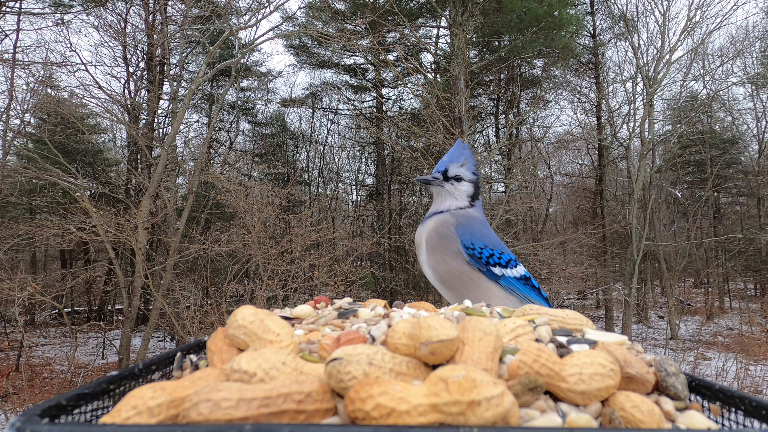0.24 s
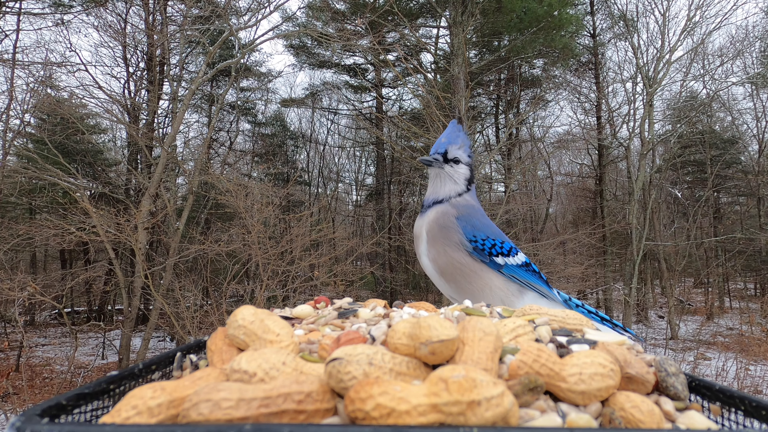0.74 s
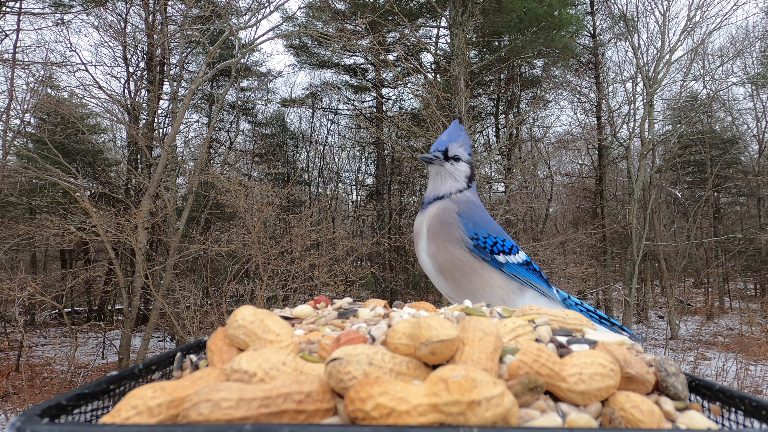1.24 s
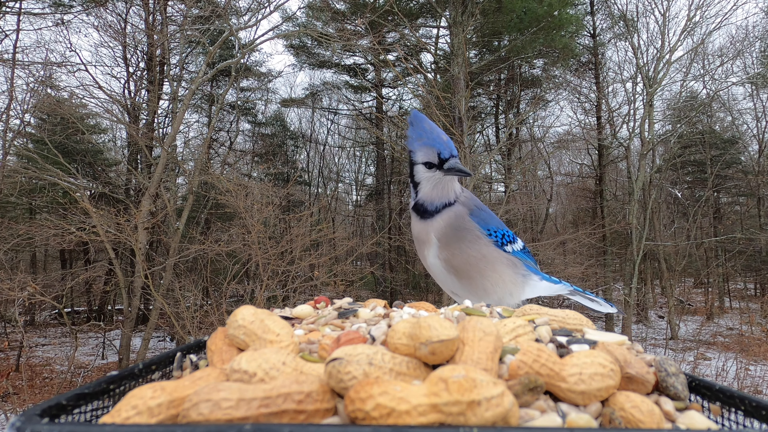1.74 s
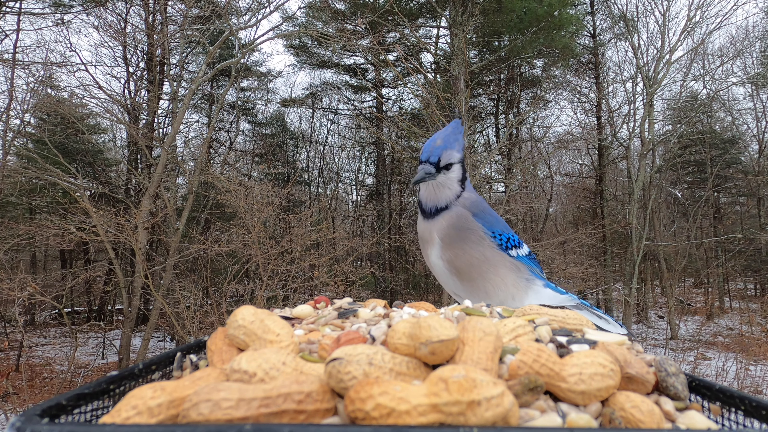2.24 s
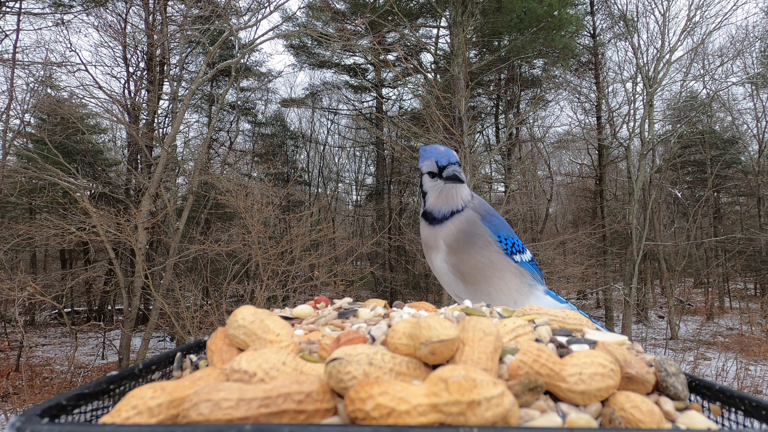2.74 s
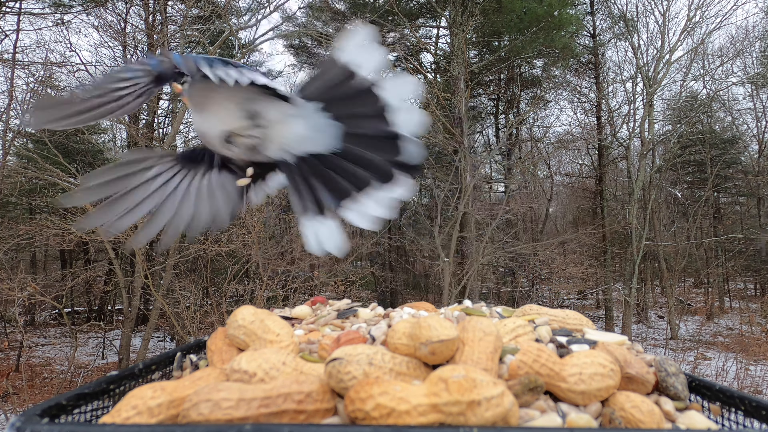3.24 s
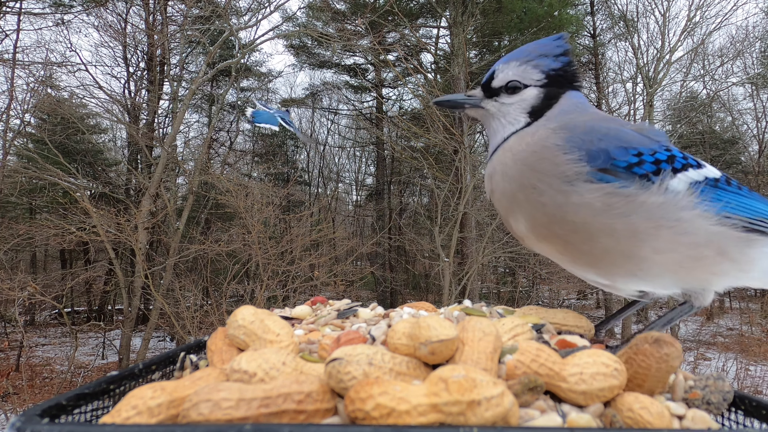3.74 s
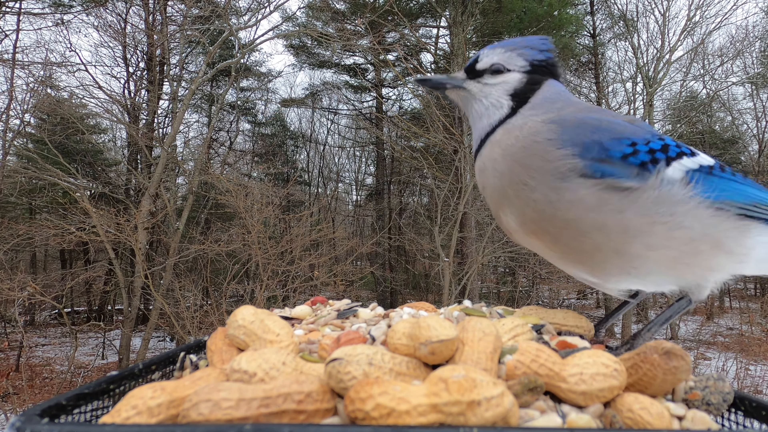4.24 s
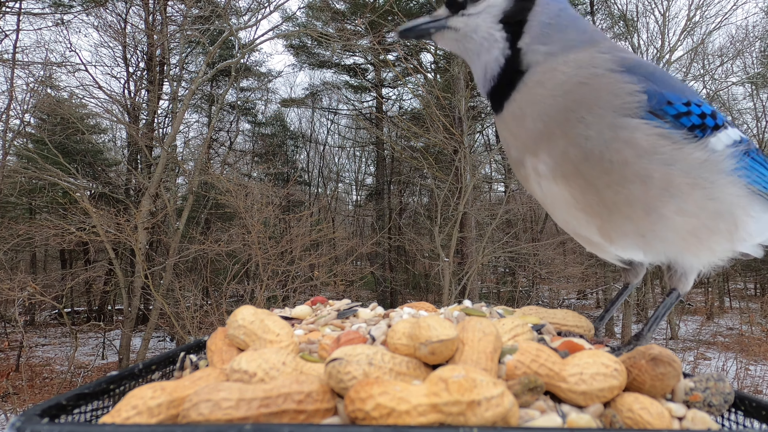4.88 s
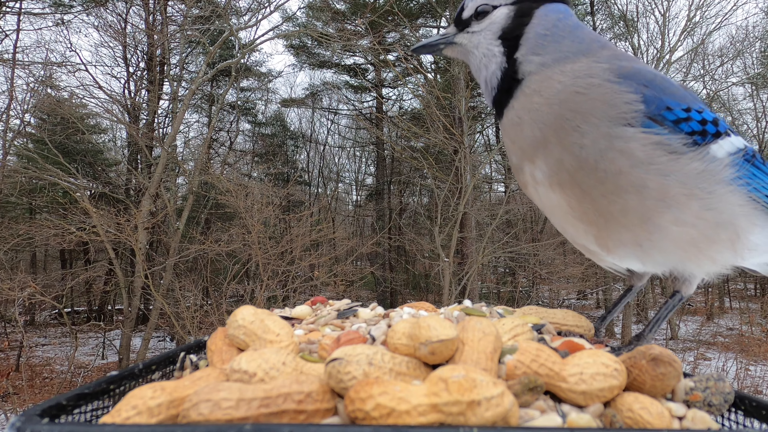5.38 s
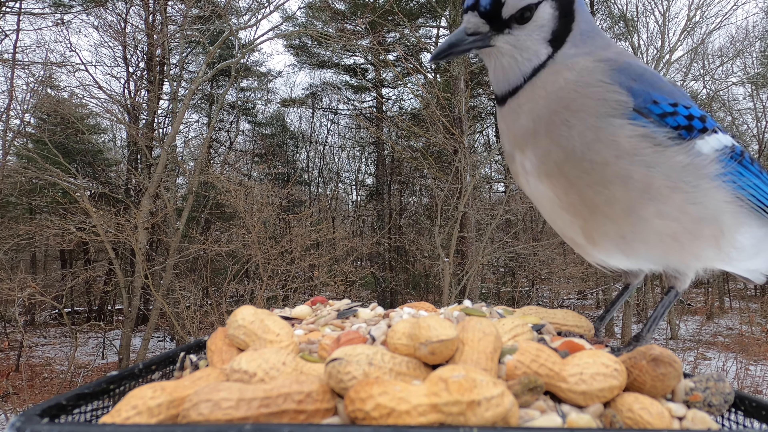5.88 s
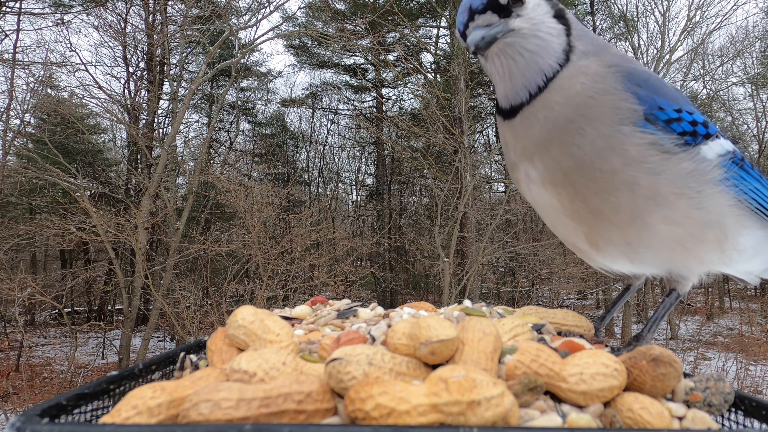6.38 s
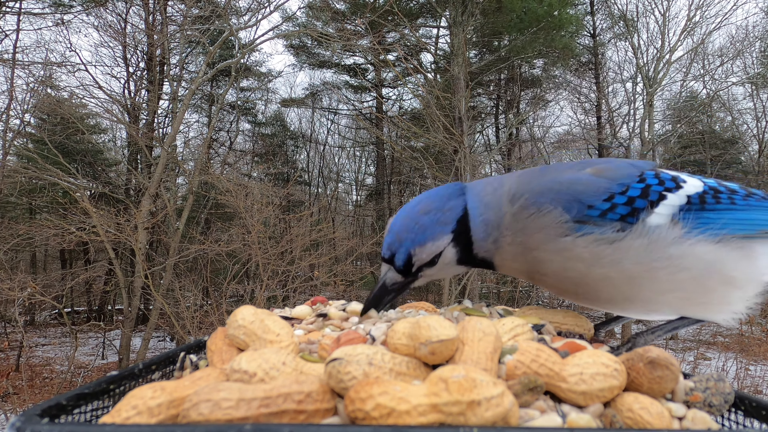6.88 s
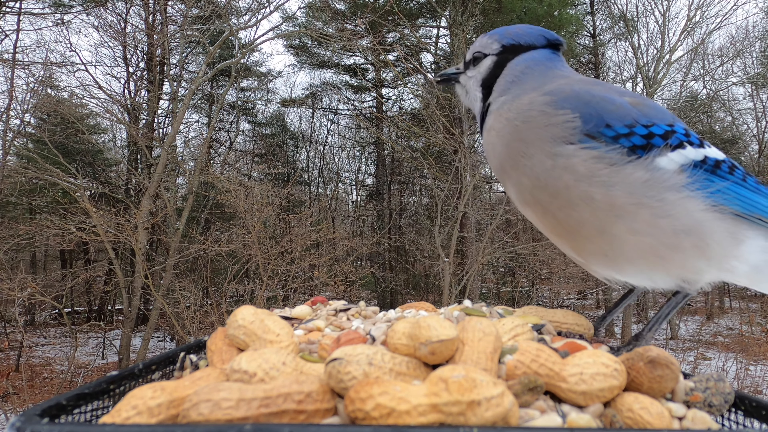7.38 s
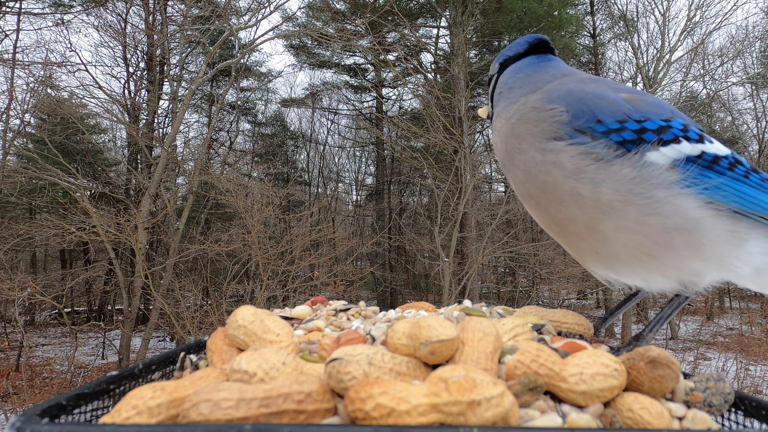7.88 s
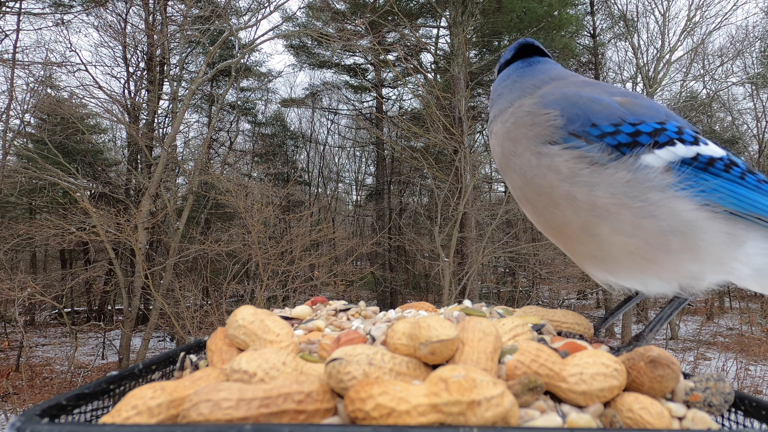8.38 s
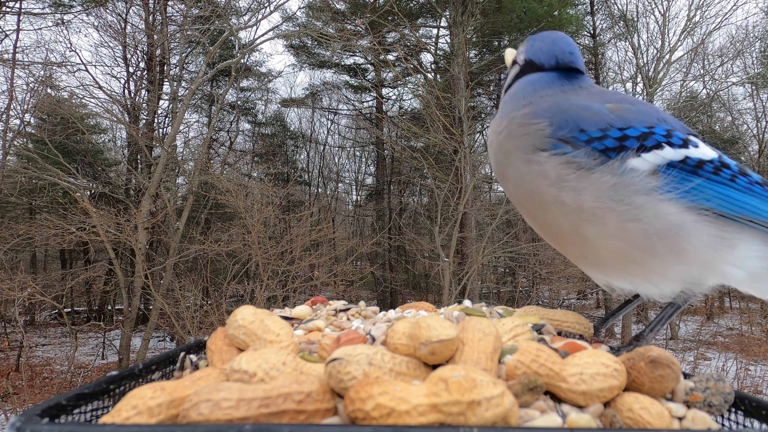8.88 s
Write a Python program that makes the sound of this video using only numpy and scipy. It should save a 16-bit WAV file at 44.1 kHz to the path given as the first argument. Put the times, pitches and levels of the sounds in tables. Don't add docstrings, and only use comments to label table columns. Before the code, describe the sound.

A small microphone sits right beside a nut-filled feeder tray in bare woods, over a faint low hum and light breeze. At 0 s a wing gust buffets it with slight claw scrapes, fading by 0.4 s. Thin high chips, faint trills and distant nasal crow caws follow. From 2.9 s feathers rustle and flap with claw scratches; around 3.4 s feet hit the tray with a sharp, short ringing knock, and a heavy low wing gust peaks near 3.6 s, dying by 4.2 s. From about 4.4 to 4.95 s the close jay calls loudly: gritty rasp, then two rounds of quick squeak and descending clear whistle, with a higher piping note, hoarse mutters and hard throat pops. Then quiet; crows caw and small birds chip, more strongly after 6.5 s. Dry bill ticks on nuts cluster at 6.8-7.3 s, with a few later, the last near 9 s.

```python
import sys
import numpy as np
from scipy import signal
from scipy.fft import rfft, irfft, next_fast_len
from scipy.io import wavfile
from scipy.ndimage import uniform_filter1d

SR = 44100
rng = np.random.default_rng(int(sys.argv[2]) if len(sys.argv) > 2 else 0)


def makeup_ratio(level_db):
    decades = np.asarray(level_db, float) / 20
    return 10 ** decades


def log_audio(samples):
    frames = np.atleast_2d(samples).T
    limited = np.clip(frames, -1, 1)
    pcm = np.round(limited * 32767).astype(np.int16)
    wavfile.write(sys.argv[1], SR, pcm)


N = 402191
T = np.arange(N) / SR


def unit(x):
    return x / np.sqrt(np.mean(x ** 2))


def colour(points):
    hz, db = np.transpose(points)
    log_hz = np.log(np.fft.rfftfreq(N, 1 / SR) + 1)
    gain = makeup_ratio(np.interp(log_hz, np.log(hz), db))
    return unit(irfft(rfft(rng.standard_normal(N)) * gain, N))


def band(x, lo_hz, hi_hz, order=2):
    return signal.sosfilt(signal.butter(order, [lo_hz, hi_hz], "bandpass", fs=SR, output="sos"), x)


def walk(rate_hz):
    k = int(SR / rate_hz)
    steps = np.repeat(rng.standard_normal(N // k + 1), k)
    return unit(uniform_filter1d(uniform_filter1d(steps, k), k)[:N])


def patchy(x, depth_db, rate_hz):
    edges_hz = np.geomspace(400, 16000, num=9)
    out = 0
    for k in range(8):
        out = out + (-1) ** k * band(x, edges_hz[k], edges_hz[k + 1]) * makeup_ratio(depth_db * walk(rate_hz))
    return unit(out)


def track(tables, fade_s=0.0014):
    rows = np.concatenate(tables)
    gate = 0
    for t in tables:
        inside_s = np.minimum(T - t[0][0] + fade_s, t[-1][0] + fade_s - T)
        gate = gate + np.clip(inside_s / fade_s, 0, 1)
    return np.interp(T, rows[:, 0], rows[:, 1]), np.minimum(gate, 1)


def bump(s, ms):
    return np.exp(-(1000 * (T - s) / ms) ** 2)


def pan(x, db):
    return x * makeup_ratio(np.array([db, -db]).reshape(2, -1) / 2)


def add(out, s, piece):
    i = max(int(s * SR), 0)
    n = min(piece.shape[-1], N - i)
    out[..., i:i + n] += piece[..., :n]


def stack(table, partials, waver, shake=1):
    s, hz = np.transpose(table)[:2]
    t = np.arange(s[0], s[-1], 1 / SR)
    i = (t * SR).astype(int)
    phase = 2 * np.pi * np.cumsum(np.interp(t, s, hz) * (1 + waver[i % N])) / SR
    edge = np.clip(np.minimum(t - s[0], s[-1] - t) / 0.0018, 0, 1)
    note = np.zeros(len(t))
    for k, db in partials:
        if k * hz.max() < .36 * SR:
            shimmer_db = (.4 + 1.1 * min(k - 1, 3)) * waver[(i + 9000 * k) % N] / waver.std()
            note += makeup_ratio(np.interp(t, s, db) + shake * shimmer_db) * np.sin(k * phase)
    return np.sqrt(2) * edge * note


def hum():
    # pitch_hz, level_db
    spectrum = [(60, -13), (110, -15), (160, -6), (315, -14), (450, -16.5), (600, -25), (1300, -26.5),
                (2000, -32.5), (3000, -41.5), (4000, -42.5), (6000, -44.5), (7500, -43), (8600, -54),
                (15500, -68)]
    # time_s, level_db
    loudness = [(0, -60.5), (.6, -63.5), (1.6, -64.5), (2.8, -64), (4.3, -61), (4.5, -64), (4.9, -66),
                (5.1, -65.5), (6.5, -62), (9.12, -62)]
    # time_s, level_db
    breezes = [
        [(0.5, -58), (0.83, -72), (2.9, -56)],
        [(4.45, -65), (4.75, -76), (5.3, -62.5), (9.12, -60.5)],
    ]
    level = makeup_ratio(np.interp(T, *np.transpose(loudness)) + 0.85 * walk(3.8))
    breeze_db, gate = track(breezes, 0.098)
    breeze = gate * makeup_ratio(breeze_db) * unit(band(rng.standard_normal(N), 6.9, 50))
    air = colour(spectrum)
    air = air + band(air, 2500, 16000, order=1) * (makeup_ratio(2.2 * walk(3.5)) - 1)
    return level * (air + 0.32 * colour(spectrum) * np.array([[1], [-1]])) + breeze


def eddies(lo_hz, hi_hz, smooth_s):
    x = band(rng.standard_normal((2, N)), lo_hz, hi_hz, order=3)
    return x / np.sqrt(uniform_filter1d(x ** 2, int(smooth_s * SR), axis=1) + 1e-12)


def gusts():
    # time_s, level_db
    flows = [
        [(0.0, -20.5), (0.05, -14.5), (0.1, -29.5), (0.308, -44), (0.5, -68)],
        [(2.9, -72), (3.2, -35.5), (3.33, -26.5), (3.41, -30.5), (3.45, -27), (3.53, -31), (3.579, -18),
         (3.72, -24), (4.25, -57.5)],
        [(4.27, -80), (4.354, -40), (4.45, -68)],
    ]
    # time_s, left_minus_right_db
    side = [(0, -29), (.2, -4.5), (3.5, 2.5), (3.57, -37), (3.62, 0), (3.75, -3), (4.2, 11.5)]
    # centre_s, level_db, length_ms, brightness_db
    slaps = [(.012, -15.5, 11.4, -7.5), (.044, -24.5, 6, 2), (.11, -35.5, 48, -43), (2.975, -53, 15, -9),
             (3.12, -55, 30, -12), (3.2, -42, 18, -6), (3.583, -20, 9, 0), (3.63, -28.5, 7.2, 0),
             (3.648, -25.5, 13, -18), (3.671, -29, 3.5, -1), (3.71, -40, 12, -28)]
    flow_db, gate = track(flows, 0.025)
    flow_db = uniform_filter1d(flow_db, size=300)
    push, flutter, buffet = makeup_ratio(flow_db), makeup_ratio(1.32 * flow_db - 9.5), makeup_ratio(1.29 * flow_db - 22.5)
    for s, db, ms, bright_db in slaps:
        slap = makeup_ratio(db) * bump(s, ms)
        flutter, buffet = flutter + slap, buffet + makeup_ratio(bright_db) * slap
    slow = eddies(10, 55, 0.029)
    spatter = makeup_ratio(-14.5 + 5.8 * walk(150)) * eddies(552, 1100, 0.0087)
    quick = flutter * eddies(70, 220, 0.031) + buffet * (eddies(240, 535, 0.016) + spatter)
    lean = pan(1, np.interp(T, *np.transpose(side)))
    air = push * (slow[0] + 0.4 * slow[1] * np.array([[1], [-1]]))
    air = air + 2 * quick * lean / np.sqrt(np.sum(lean ** 2, axis=0))
    return .6 * np.tanh(gate * air / .6)


def tray():
    # start_s, peak_db, brightness_db
    scrapes = [(0.0096, -35, 4.5), (0.03, -41, 4), (2.9298, -55, 8.5), (2.9624, -43, -4), (2.972, -44, -3),
               (3.022, -43, -3), (3.028, -46, 5), (3.085, -42, -6), (3.092, -35, 1), (3.1118, -25, 4),
               (3.117, -28, 4), (3.122, -31, 4), (3.127, -30, 1), (3.1407, -34, 1.5), (3.147, -35, 0),
               (3.1592, -34, 1), (3.1822, -41, 1), (3.2063, -42.5, -6), (3.245, -42, 3), (3.2523, -41, -1),
               (3.3229, -39, 2), (3.3518, -41, -2), (3.4032, -42, 0), (3.4165, -19, -1), (3.422, -22, 2),
               (3.431, -27, 2), (3.468, -43, 2), (3.5109, -40, 7), (3.558, -39, 6.5), (3.5878, -44, 5),
               (3.6322, -47, 3), (3.6855, -52, -5), (3.7115, -50, 0), (3.7589, -46, -1), (3.7768, -48, 4),
               (3.7948, -51, 4), (3.816, -46.5, 8), (3.8291, -44, -5), (3.906, -58, 2), (3.9659, -58, 2)]
    # start_s, peak_db
    ticks = [(4.052, -47.5), (4.289, -51.5), (6.771, -44), (6.777, -31.5), (6.809, -41.5), (6.906, -47),
             (6.913, -38.5), (6.926, -51), (7.082, -57.5), (7.123, -52), (7.136, -42.5), (7.152, -40),
             (7.252, -41), (7.341, -47.5), (7.905, -49.5), (7.923, -56), (8.549, -51.5), (8.979, -37),
             (8.984, -42.5)]
    # pitch_hz, level_db_per_hz
    grit = [(1290, -1), (2200, -4.5), (3000, 2), (4190, 3), (7620, -5), (8600, -14), (12000, -18),
            (16000, -27)]
    # time_s, level_db
    rustle = [(2.91, -84), (2.95, -69), (3.1, -66), (3.12, -55.5), (3.238, -55), (3.42, -53),
              (3.866, -69.5), (4.0, -78)]
    # centre_s, level_db, length_ms
    flaps = [(3.135, 2, 25), (3.215, 4, 18), (3.262, 6, 22), (3.31, 1.5, 14), (3.365, 3, 22),
             (3.445, 5, 20), (3.5, 3, 15), (3.6, 5, 30), (3.7, 4, 25), (3.8, 4, 35)]
    # pitch_hz, level_db, t60_s
    modes = [(385.3, -1.5, 0.08), (572, -5, 0.024), (760, 1.5, 0.016), (1197, -0.5, 0.016),
             (1362, -24, 0.19)]
    # start_s, level_db
    landing = [
        (3.4185, -18.5),
        (3.424, -12),
        (3.433, -17),
        (3.438, -27.5),
    ]
    low = unit(band(rng.standard_normal(N), 900, 1700))
    high = patchy(colour(grit), 1.2, 70)

    rustle_db, gate = track([rustle], .02)
    flicker_db = 2.6 * walk(200) + 1.8 * walk(30)
    rustle_db = rustle_db - 3 + sum(d * bump(s, ms) for s, d, ms in flaps)
    out = pan(gate * makeup_ratio(rustle_db + flicker_db) * (makeup_ratio(1.5) * low + high), 0)
    out += .7 * np.roll(out[0], 300) * np.array([[1], [-1]])

    t = np.arange(int(.05 * SR)) / SR
    bright_ticks = [(s, db, 2) for s, db in ticks]
    for events, rise_s, t60_s, trim_db in ((scrapes, .001, .028, -7), (bright_ticks, .0006, .012, -4)):
        shape = np.minimum(1, t / rise_s) * (makeup_ratio(trim_db - 60 * t / t60_s) + makeup_ratio(-26 - 60 * t / .12))
        for s, db, bright_db in events:
            i = int(s * SR) - 20000
            burst = makeup_ratio(-bright_db) * low[i:i + len(t)] + makeup_ratio(bright_db - 5.5) * high[i:i + len(t)]
            add(out, s, makeup_ratio(db) * shape * burst)

    ring = sum(makeup_ratio(db - 60 * t / t60_s) * np.sin(2 * np.pi * hz * t) for hz, db, t60_s in modes)
    for s, db in landing:
        add(out, s, pan(makeup_ratio(db) * ring / np.abs(ring).max(), 5.8))
    return out


def chip(db, hz, ms, leg, breath):
    u = np.arange(0, 1 + leg, 1000 / ms / SR)
    arch, late = 2 * np.minimum(u, 1) - 1, np.maximum(u - .85, 0)
    pitch = 1.015 - .12 * arch ** 2 - .1 * arch ** 8 - .55 * late + .018 * breath[::-1][:len(u)]
    phase = 2 * np.pi * np.cumsum(hz * pitch) / SR
    swell_db = db - 3 * arch ** 2 - 26 * arch ** 6 - 3 * late - 22 * leg * np.minimum(arch, 0) ** 2
    swell = makeup_ratio(swell_db) * np.minimum(1, 7 * np.minimum(u, 1 + leg - u))
    image = makeup_ratio(-27) * np.sin(2 * np.pi * 12000 * u * ms / 1000 - phase)
    return swell * (1 + breath[:len(u)]) * (np.sin(phase) + makeup_ratio(-34) * np.sin(2 * phase) + image)


def songbirds():
    # top_s, peak_db, top_hz
    chips = [(0.033, -51, 5340), (0.148, -51.5, 5150), (0.253, -58.5, 4860), (1.1987, -54.5, 5330),
             (1.436, -60.5, 4980), (1.71, -54.5, 5250), (1.9555, -61.5, 4970), (2.218, -53.5, 5370),
             (2.6354, -55.5, 5110), (3.0385, -48, 5430), (3.47, -49, 5450), (4, -48, 5490),
             (4.2259, -51.5, 5402), (5.73, -61.5, 5230), (6.0285, -60, 5800), (6.323, -57, 4987),
             (6.49, -50.5, 5285), (6.6553, -50, 5180), (6.8473, -46.5, 5314), (7.3384, -51.5, 5186),
             (7.5824, -52, 5250), (7.7787, -45, 5440), (8.1589, -47.5, 5230), (8.366, -48, 5200),
             (8.579, -43.5, 5370), (8.928, -47, 5320)]
    # delay_s, level_db
    trunks = [(.006, -12), (.011, -14), (.027, -17), (.057, -19)]
    # top_s, top_hz, level_db, octave_db
    arches = [(.036, 5300, -64, -20), (.154, 5300, -63, -14), (.258, 4750, -65, -14), (.359, 3750, -70, -8),
              (.479, 2780, -73, 4)]
    # start_s, length_s, level_db
    flicks = [(0.652, .014, -65), (1.539, 0.045, -74.5), (1.691, .014, -69), (5.195, 0.021, -68),
              (5.399, 0.068, -79.5), (6.415, 0.022, -73.5), (7.441, 0.022, -71), (8.708, 0.022, -75.5)]
    # start_s, length_s, from_hz, to_hz, level_db
    glides = [(3.87, 0.068, 2150, 1736, -67), (4.058, 0.16, 2925, 2507, -72),
              (5.091, .07, 2100, 1476, -65.5), (5.481, 0.071, 2092, 1600, -64),
              (5.663, 0.11, 2150, 1395, -67), (6.088, 0.052, 2095, 1694, -64.5),
              (6.328, .045, 2060, 1600, -65), (6.989, 0.075, 2034, 2140, -74.5),
              (8.439, 0.05, 1660, 1650, -68), (7.849, 0.05, 1633, 1597, -67.5),
              (5.805, .03, 1510, 1480, -68), (6.362, .028, 1400, 1250, -65), (6.478, .025, 1360, 1300, -67),
              (6.553, .025, 1320, 1300, -71), (6.63, .06, 1480, 1520, -72), (6.655, .04, 960, 930, -71),
              (6.875, .03, 1350, 1400, -70)]
    # start_s, length_s, pitch_hz, width_hz, level_db
    trills = [(0.592, 0.05, 4700, 4600, -65), (0.693, 0.18, 7100, 1390, -77.5),
              (1.398, 0.18, 7970, 1200, -75.5), (1.716, 0.17, 6900, 1500, -78),
              (5.236, 0.13, 7110, 1477, -77.5), (5.316, 0.079, 5470, 1780, -68),
              (5.004, 0.065, 5240, 1516, -68), (6.023, 0.049, 5700, 1420, -61),
              (7.496, 0.2, 6850, 1800, -74.5), (8.74, 0.11, 7400, 797, -80.5),
              (8.121, 0.035, 6280, 5100, -73.5)]
    out = np.zeros((2, N))
    breath = 0.18 * walk(300) + 0.11 * unit(band(rng.standard_normal(N), 700, 2100))
    quaver = .8 * walk(350)

    for s, db, hz in chips:
        leg, ms = (.6, 23) if s < 4.5 else (.1, 31)
        note = chip(db, hz, ms, leg, (breath + leg * quaver)[int(s * SR):][:SR // 10])
        add(out, s - .009, pan(note, 3.1))
        scatter = rng.standard_normal((len(trunks), 2))
        for (lag_s, echo_db), (shift, size) in zip(trunks, scatter):
            echo = pan(makeup_ratio(echo_db + 2 * size) * note, 4 * shift)
            add(out, s - .009 + lag_s * (1 + .1 * shift), echo)

    u = np.linspace(-1, 1, num=15)
    for s, hz, db, octave_db in arches:
        arch = np.transpose([s + .027 * u / 2, hz * (1 - .5 * np.abs(u) ** 1.7)])
        partials = [(1, db - 9 * np.abs(u)), (2, db + octave_db - 14 * np.abs(u))]
        add(out, arch[0, 0], stack(arch, partials, .06 * breath))

    sweeps = [(s, length, 6000, 7850, db) for s, length, db in flicks] + list(glides)
    for s, length, from_hz, to_hz, db in sweeps:
        u = np.linspace(0, 1, int(length * SR))
        phase = 2 * np.pi * np.cumsum(from_hz + (to_hz - from_hz) * u ** .7) / SR
        swell = makeup_ratio(db) * np.sqrt(2 * np.sin(np.pi * u))
        add(out, s, swell * np.sin(phase) * (1 + 2 * breath[:len(u)]))

    hiss = rng.standard_normal(N)
    for s, length, hz, width_hz, db in trills:
        u = np.linspace(0, 1, int(length * SR))
        buzz = band(hiss[int(s * SR):][:len(u)], hz - width_hz / 2, hz + width_hz / 2, order=4)
        swell = np.minimum(1, 12 * u) * (1 - u ** 2.4)
        add(out, s, makeup_ratio(db) * unit(buzz) * swell * (1 + breath[:len(u)]))
    return out


def crows():
    # start_s, top_hz, level_db
    caws = [(0.262, 548, -66), (0.618, 551.4, -66.5), (1.274, 548.5, -63.5), (4.974, 566.2, -63.5),
            (5.365, 553.3, -63), (5.961, 558.3, -62.5), (7.265, 546.8, -61), (7.584, 565, -58.5),
            (8.102, 547.8, -59), (8.658, 554.4, -60), (9.04, 554, -59.5)]
    # multiple, level_db
    caw_partials = [(2, -7.5), (3, -2), (4, 2), (5, -13), (6, -27)]
    out, waver = np.zeros(N), 0.0076 * walk(150)
    u = np.linspace(0, 1, num=12)
    for s, hz, db in caws:
        length_s = .175 if s > 1 else .15
        arch = np.transpose([s + length_s * u, hz * (1 - 0.6 * (u - .52) ** 2)])
        swell_db = db - 11 * np.abs(2 * u - 1) ** 3
        add(out, s, stack(arch, [(k, swell_db + d) for k, d in caw_partials], waver, shake=.4))
    return out * (1 + .12 * walk(60) + .2 * walk(500))


def woods(x, t60_s, db, gap_s=0.0025, steady=.35):
    t = np.arange(int(.8 * SR)) / SR
    decay = makeup_ratio(1.1 * walk(40)[:len(t)] - 60 * t / t60_s) * np.clip(t / gap_s, 0, 1) ** 2
    tail = rng.standard_normal((2, len(t))) * decay
    tail = tail / np.sqrt(np.sum(tail ** 2) / 2)
    blurred = x * (steady + .8 * walk(700))
    return x + makeup_ratio(db) * signal.fftconvolve(blurred, tail, axes=1)[:, :N]


def sing(s, length, hz, db, sag, kind):
    (attack_s, release_s, settle, swell_db), first, last = kind
    first, last = np.array(first), np.array(last)
    edge_db = -26
    levels = db + np.array([first + edge_db, first, (first + last) / 2 + swell_db, last, last + edge_db])
    u = np.linspace(0, length, num=24)
    knots_s = [0, attack_s, length / 2, length - release_s, length]
    levels = [np.interp(u, knots_s, column) for column in levels.T]
    return np.column_stack([s + u, hz * (1 + sag * np.exp(-settle * u / length)), *levels])


def jay():
    # start_s, length_s, pitch_hz, level_db, sag_share
    squeaks = [(4.482, .034, 2810, -17, .05), (4.743, .038, 2785, -22, .045)]
    whistles = [(4.521, .065, 1263, -14.5, .08), (4.783, .066, 1243, -15.5, .03)]
    pipes = [(4.648, .098, 1885, -18, .07)]
    # (attack_s, release_s, settling_rate, mid_swell_db),
    # then levels_db of partials 1-4 after the attack, and before the release
    squeak = (.004, .006, 1.5, -3), (-9.5, -0.5, -14, -36), (-22, -17, -38, -50)
    whistle = (.007, .012, 7, 2), (-1.5, -16, -21, -29), (-4.5, -27, -10, -19)
    pipe = (0.022, .018, 3, 2), (-25, -4, -22, -34), (-27, -7, -15, -22)
    # start_s, length_s, from_hz, to_hz, level_db
    mutters = [(4.5, .026, 1240, 1340, -42), (4.597, .011, 1000, 1250, -42), (4.612, .064, 1130, 1484, -39),
               (4.764, .027, 1300, 1270, -35), (4.866, .026, 1150, 1050, -45),
               (4.889, .019, 1420, 1370, -36), (4.914, .019, 1420, 1380, -39),
               (4.398, .022, 2500, 2350, -45), (4.35, .03, 2150, 2150, -66)]
    # centre_s, peak_db, pitch_hz, length_ms
    pops = [(4.579, -19, 3710, 4.6), (4.587, -8.5, 3650, 2.16), (4.592, -21, 3490, 2.7),
            (4.727, -17.5, 3810, 1.8), (4.847, -7, 3594, 1.17), (4.85, -16, 3500, 4.2),
            (4.857, -18, 3550, 1.3), (4.908, -23.5, 3510, 2.6), (4.918, -26, 3510, 2.5),
            (4.773, -29, 3648, 4.9), (4.518, -45, 620, 2), (4.597, -48, 720, 2.5), (4.856, -45, 660, 2.5),
            (4.728, -30, 7750, 2.5), (4.853, -38, 7000, 3), (4.891, -30, 3200, 2.5), (4.41, -30, 4700, 5)]
    # pitch_hz, level_db
    throat = [(290, -65), (500, -30), (1080, -12.5), (2200, -23), (3610, 2), (4670, 0), (6960, -10.5),
              (8130, -14), (8860, -41), (11000, -28.5), (15000, -55)]
    # time_s, level_db
    rasp = [(4.3, -79), (4.32, -57), (4.375, -58.5), (4.41, -30), (4.462, -30.5), (4.482, -45), (4.92, -43),
            (4.945, -65), (4.975, -80)]
    # centre_s, level_db, length_ms
    rasp_bursts = [(4.397, -33, 1.5), (4.405, -36, 2.5), (4.43, -31, 2), (4.452, -34, 1.6),
                   (4.462, -35, 2.2), (4.519, -29, 4), (4.603, -39, 3), (4.616, -38, 3.5), (4.636, -38, 5),
                   (4.635, -42, 25), (4.775, -43, 5), (4.87, -47, 4), (4.891, -39, 1.6),
                   (4.911, -22.5, 1.6), (4.925, -47, 5)]
    out, waver = np.zeros(N), .0065 * walk(120)
    for rows, kind in ((squeaks, squeak), (whistles, whistle), (pipes, pipe)):
        for row in rows:
            note = sing(*row, kind)
            db = note.T[2:]
            high = [(k, db[3] - 15 * (k - 4) - 10 * (k * row[2] > 9000)) for k in range(5, 10)]
            add(out, row[0], stack(note, list(enumerate(db, 1)) + high, waver))
    still = 1 / (1 + 18 * uniform_filter1d(np.abs(out), size=200))

    hoarse = 1 + 0.5 * walk(200)
    for s, length, from_hz, to_hz, db in mutters:
        partials = [(1, [db] * 2), (2, [db - 15.5] * 2), (3, [db - 6] * 2)]
        tone = stack([(s, from_hz), (s + length, to_hz)], partials, 4 * waver)
        add(out, s, tone * np.hanning(len(tone)) ** .35 * hoarse[int(s * SR):][:len(tone)])

    t = np.arange(-.008, .008, 1 / SR)
    for s, db, hz, ms in pops:
        add(out, s - .008, makeup_ratio(db) * np.exp(-(1000 * t / ms) ** 2) * np.sin(2 * np.pi * hz * t))

    grit = unit(patchy(colour(throat), 1.8, 160) * makeup_ratio(2.4 * walk(450)))
    rasp_db, gate = track([rasp])
    bursts = sum(makeup_ratio(d) * bump(s, ms) for s, d, ms in rasp_bursts)
    return out + (gate * makeup_ratio(rasp_db) * still + bursts) * grit


def mirror(x):
    image_hz = 24000
    size = next_fast_len(N)
    half = int(image_hz * size / SR / 2)
    spec = rfft(x, size)
    above = spec.shape[1] - half
    spec[:, half:] = np.conj(spec[:, half:half - above:-1])
    return band(irfft(spec, size)[:, :N], image_hz / 2, 13400)


def scene():
    far = woods(songbirds(), t60_s=.5, db=-11.5, gap_s=.015)
    far = far + woods(pan(crows(), 1.1), t60_s=1.05, db=-1.5, steady=0.85)
    voices = jay() + far
    image = makeup_ratio(-7) * mirror(band(voices, 7300, 11800, order=4))
    return voices + image + gusts() + tray() + hum()


def band_limit(x):
    return signal.sosfilt(signal.butter(12, 15960, fs=SR, output="sos"), x)


def record(dry):
    # time_s, side_gain_db
    width = [(0, 2), (.4, -8), (.9, -30), (3.38, -9), (3.42, 1.5), (3.9, -12), (4.3, -30), (5.0, -29),
             (6.5, -11.5), (9.12, 1)]
    side = (dry[0] - dry[1]) / 2 * makeup_ratio(np.interp(T, *np.transpose(width)))
    mix = dry.mean(axis=0) + side * np.array([[1], [-1]])
    return band_limit(mix)


dry = scene()
out = record(dry)
log_audio(out)
```